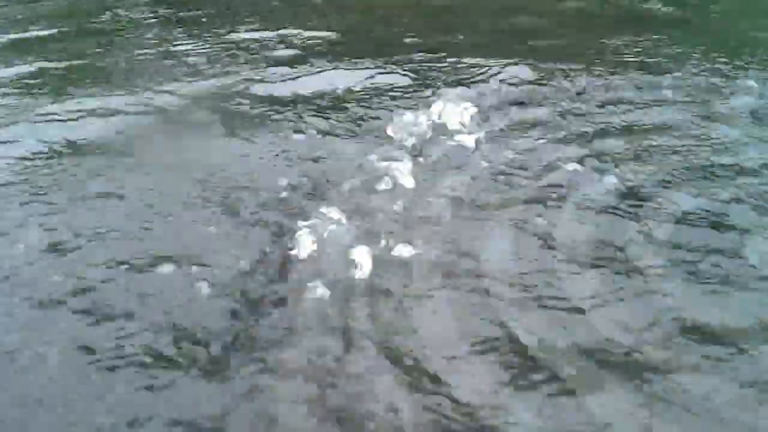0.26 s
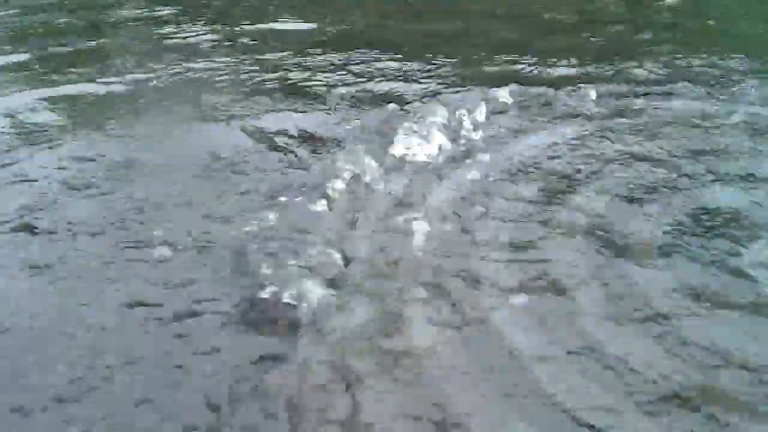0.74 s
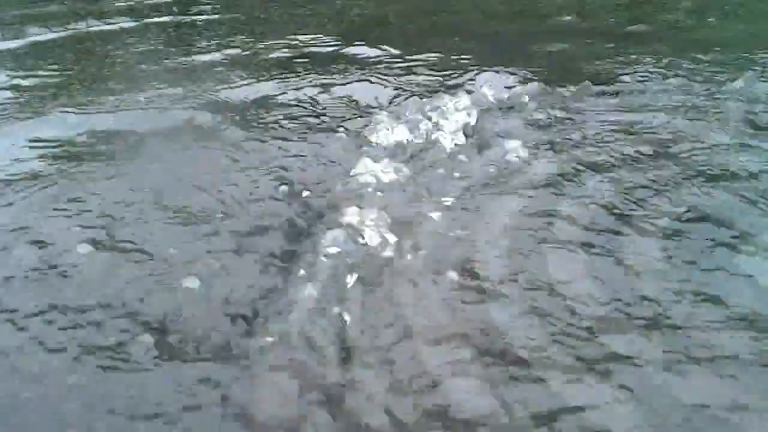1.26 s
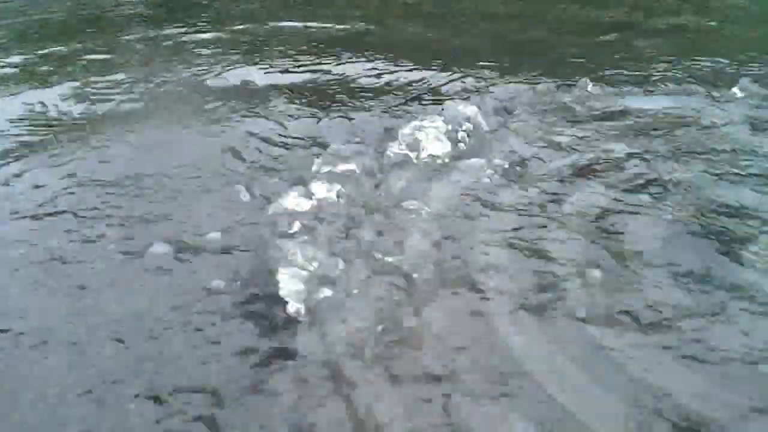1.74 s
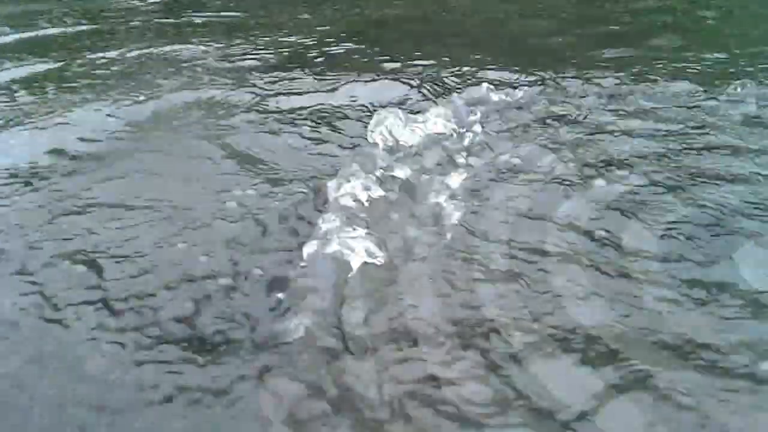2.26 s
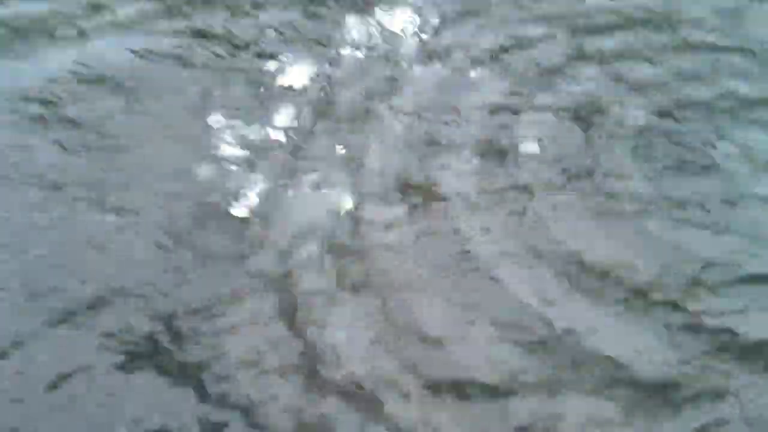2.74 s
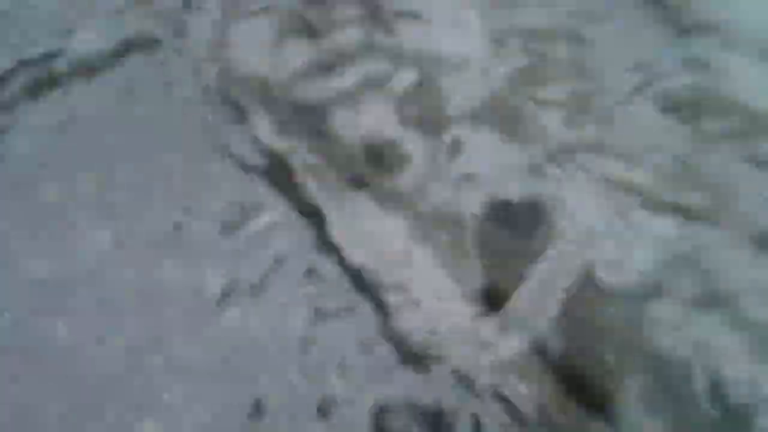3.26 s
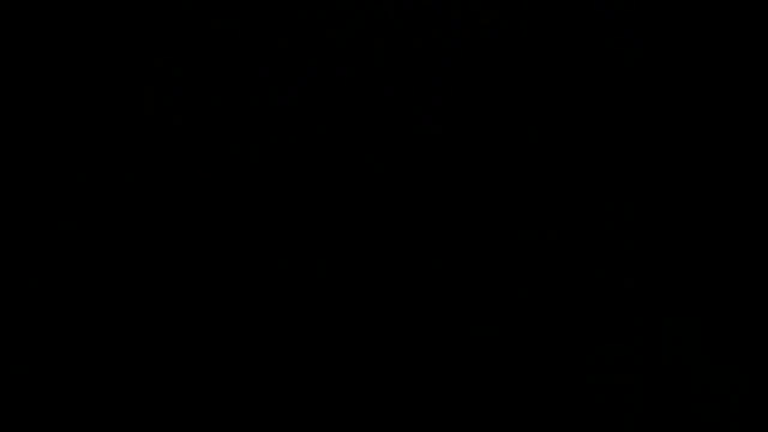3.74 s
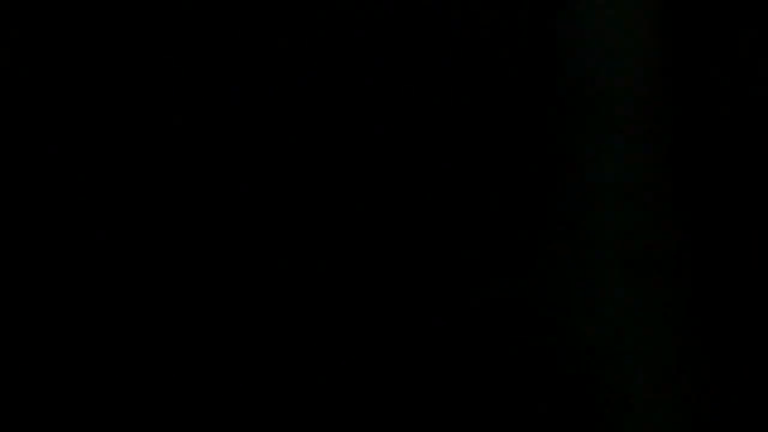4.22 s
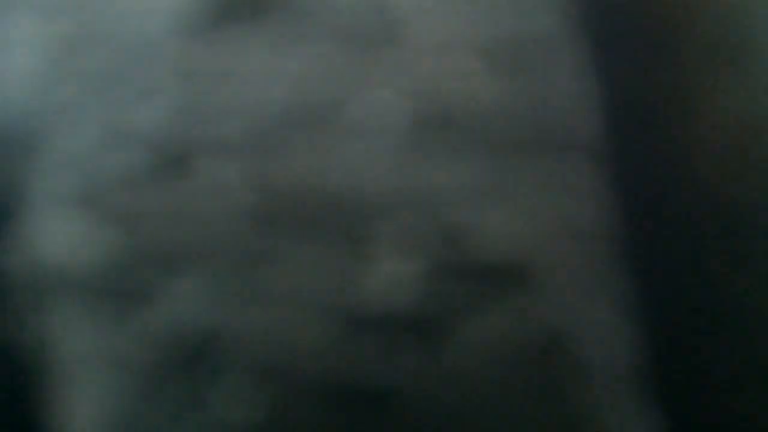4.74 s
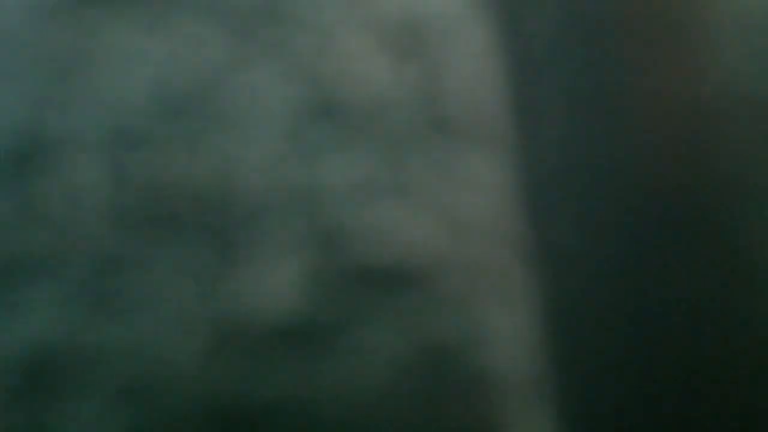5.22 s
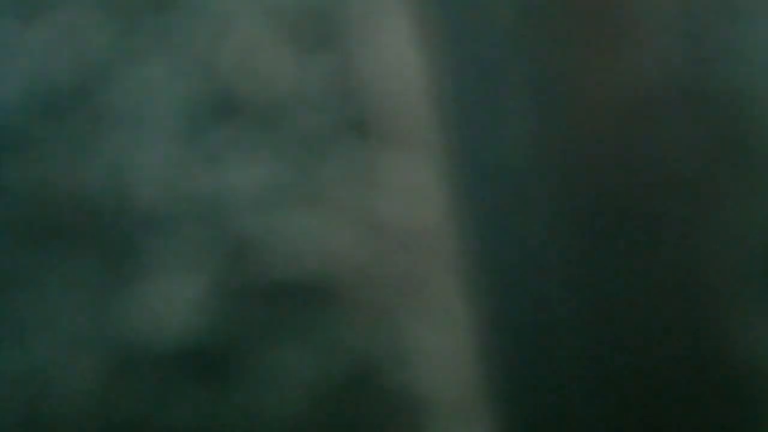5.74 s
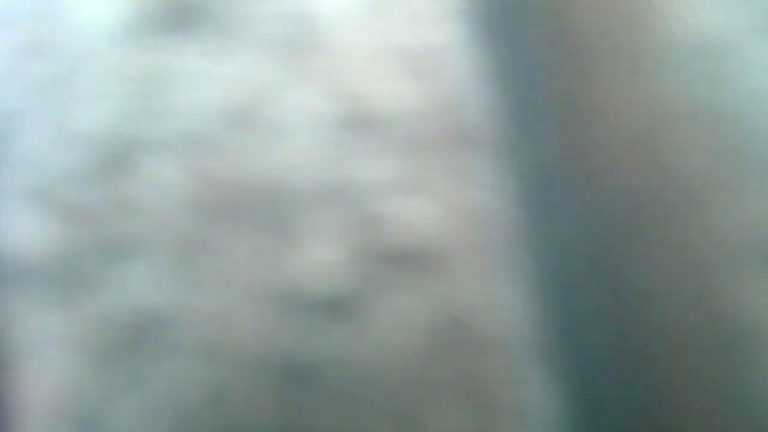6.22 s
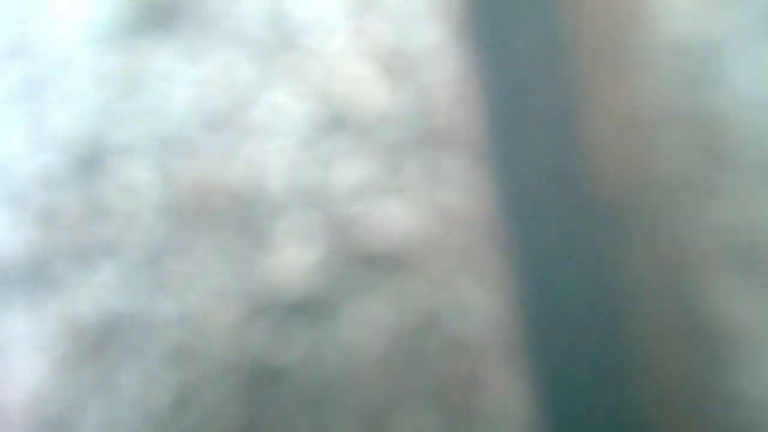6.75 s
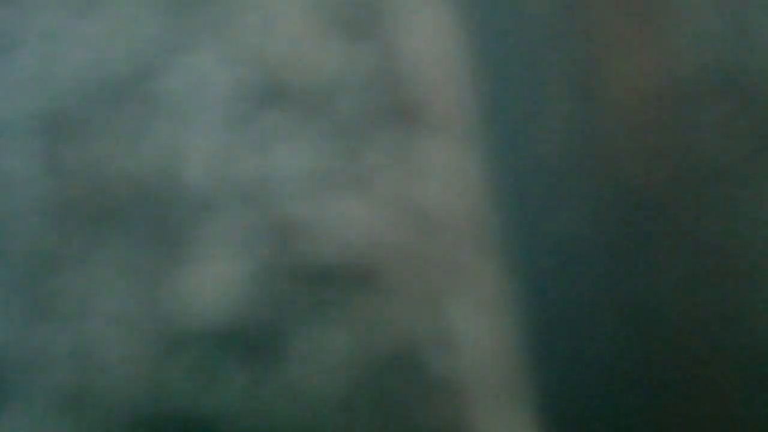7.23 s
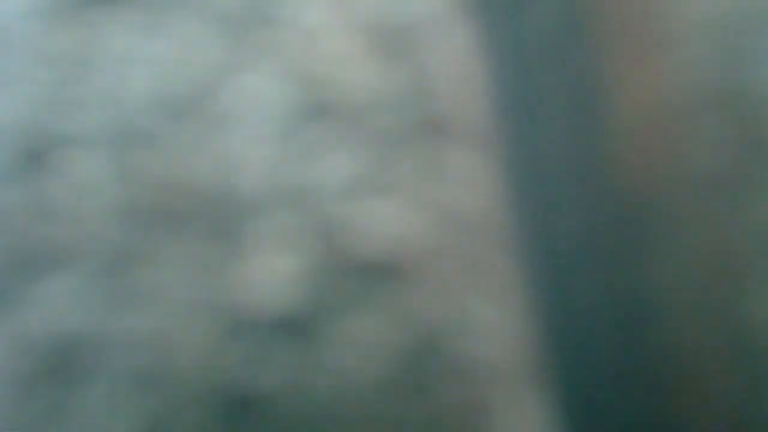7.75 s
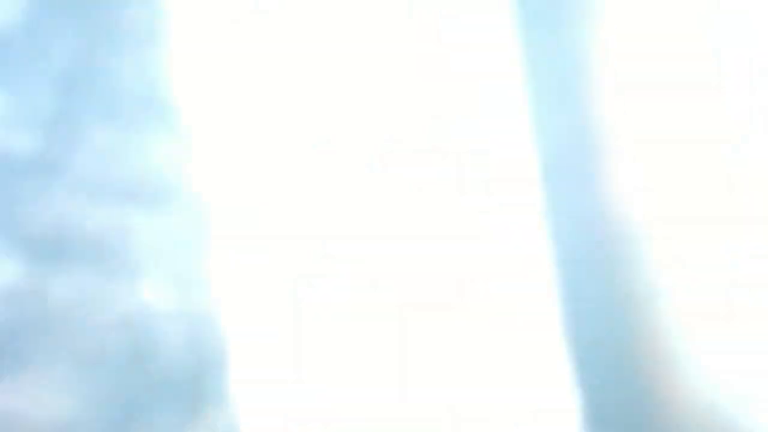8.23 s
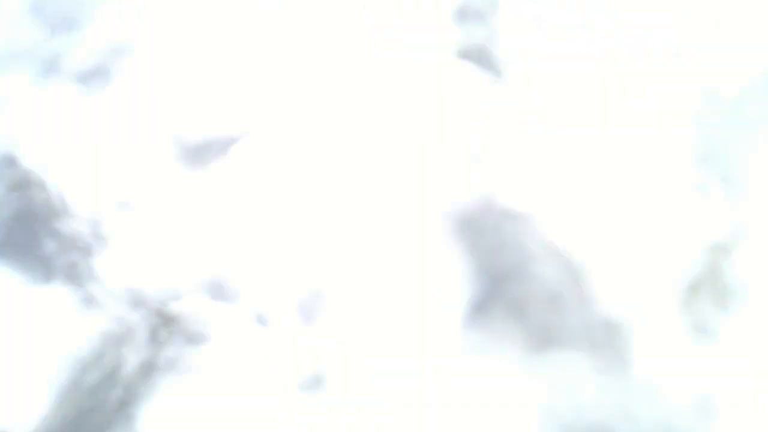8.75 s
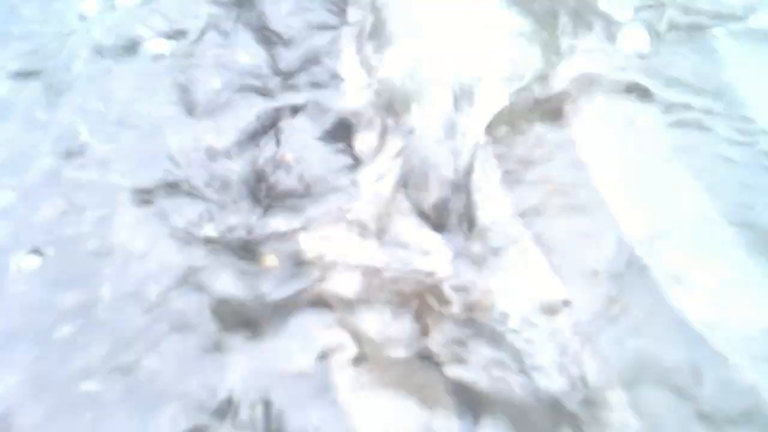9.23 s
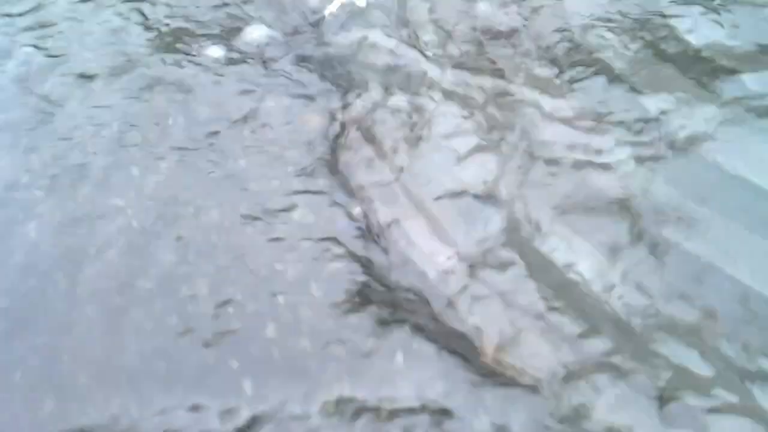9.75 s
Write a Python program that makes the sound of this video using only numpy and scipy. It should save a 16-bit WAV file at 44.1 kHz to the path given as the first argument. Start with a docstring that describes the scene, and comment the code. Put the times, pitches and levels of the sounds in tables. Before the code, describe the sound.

Quiet bright pattering of water gushing in rain comes first, steady and fairly distant. Then hollow knocks and short rubbing strokes grow as the sealed microphone enters the water. A much louder, irregular stretch follows, with bubbles popping and gurgling and wet bursts jumping left and right against it. It eases back to fizzing, trickling flow and a few drops.

```python
"""Storm water spurts from a manhole and patters onto a flooded street in the rain.
Two ports of a sealed microphone, in a waterproof camera, are lowered into the gush: water slaps and
drags along the case from about 2.7 s, closes over it near 3.8 s, then bubbles glug and spray bursts
right at the ports until they are lifted out near 9 s. Water is swarms of damped sines on shaped noise;
near bursts, bubbles, slaps and drops are placed one by one, over the low roar of rain on the street."""
import sys
import numpy as np
from scipy import signal
from scipy.fft import rfft, irfft, next_fast_len
from scipy.io import wavfile
from scipy.ndimage import uniform_filter1d, minimum_filter1d, map_coordinates

SR = 44100
rng = np.random.default_rng(int(sys.argv[2]) if len(sys.argv) > 2 else 0)


def master_out(mix):
    """Clip the mix to full scale and print it as 16-bit PCM to the path in sys.argv[1]."""
    frames = np.transpose(np.atleast_2d(mix))
    ceiling = np.clip(frames, -1, 1)
    pcm = np.round(ceiling * 32767).astype(np.int16)
    wavfile.write(sys.argv[1], SR, pcm)


N = 440096


def amp(db):
    """Decibels to amplitude."""
    return 10 ** (np.asarray(db) / 20)


def unit(x):
    """Scale to an rms of 1."""
    return x / np.sqrt(np.mean(x ** 2) + 1e-20)


def along(points, hz):
    """Read (Hz, value) points on a log frequency axis."""
    f, v = np.transpose(points)
    return np.interp(np.log(hz + 1), np.log(f + 1), v)


def curves(rows):
    """One value per sample for each column after the time."""
    s, *cols = np.transpose(rows)
    return [np.interp(np.arange(N) / SR, s, c) for c in cols]


def wobble(rate):
    """A smooth random curve, rate knots a second."""
    knots = rng.standard_normal(int(N * rate / SR) + 4)
    return map_coordinates(knots, [np.arange(N) * rate / SR])


def filtered(x, response):
    """Shape x by a real or complex response of frequency."""
    m = next_fast_len(N + 8192)
    return irfft(rfft(x, m) * response(np.fft.rfftfreq(m, 1 / SR)), m)[..., :N]


def coloured(x, spectrum):
    """Shape x by (Hz, dB) points."""
    return filtered(x, lambda hz: amp(along(spectrum, hz)))


def ports(pan_db):
    """Left and right gains of unit mean power."""
    return unit(amp([[pan_db / 2], [-pan_db / 2]]))


def add(out, s, sound):
    """Mix a stereo sound in at time s."""
    room = out[:, max(0, round(s * SR)):][:, :sound.shape[1]]
    room += sound[:, :room.shape[1]]


# Rain over the wide street. Each row: frequency in Hz, relative density in dB per Hz.
STREET_SPECTRUM = [(25, 16.5), (60, -2.5), (130, -6), (270, -2), (600, -13.5), (1200, -5.5), (2600, -23.5)]


def street():
    """The low, even roar of rain over the street: steady noise, independent at the two ports."""
    return amp(-50) * unit(coloured(rng.standard_normal((2, N)), STREET_SPECTRUM))


# Single drops into the flood. Each row: start in seconds, relative level in dB, pitch in Hz.
DROP_EVENTS = [(0.054, -27.5, 2640), (0.4825, -21.5, 4270), (0.7073, -23.5, 2140), (0.826, -24, 3410),
               (1.026, -24.5, 3060), (1.331, -25, 1430), (1.4664, -25, 5400), (1.5806, -17.5, 5080),
               (2.192, -22.5, 2800), (3.1492, -16, 6300), (3.482, -21, 4370), (3.497, -20.5, 4540),
               (8.741, -19, 3020), (8.982, -25, 1210), (9.1237, -14, 2950), (9.169, -21.5, 1344),
               (9.231, -28.5, 3640), (9.302, -24, 3080), (9.541, -28.5, 2960), (9.609, -25.5, 3300),
               (9.828, -20.5, 5140)]


def drops(cycles=5.8, tick_db=-8, plop_db=5.5, sag=0.15, size=1500):
    """A drop ticks on the surface and traps a small bubble, its pitch sagging as it is driven under."""
    out, t = np.zeros((2, N)), np.arange(size) / SR
    tick_band = signal.butter(2, [1200, 7000], "band", fs=SR)
    for s, db, hz in DROP_EVENTS:
        turns = np.cumsum(hz * (1 + sag * (2 * np.exp(-hz * t / cycles) - 1))) / SR
        envelope = np.exp(-turns / cycles) * (1 - np.exp(-2 * turns))
        ring = np.sin(2 * np.pi * turns + rng.standard_normal((2, 1))) * envelope
        tick = signal.lfilter(*tick_band, rng.standard_normal((2, size)))
        tick = tick * amp(tick_db - 60 * t / 0.017)
        add(out, s, amp(db + plop_db) * ports(rng.normal(-1.1, 1)) * (ring + tick))
    return out


# Hollow resonances of the case. Each row: frequency in Hz, width in Hz, relative level in dB.
CASE_RESONANCES = [(195, 116, -10), (650, 136, -2.5), (1306, 600, -2), (1546, 510, -0.5)]
# Water drags along the case, touching the microphone.
# Each row: start in seconds, length in seconds, relative level in dB, muffling by water 0-1.
DRAG_STROKES = [(2.659, 0.023, -37, 0.65), (2.752, 0.15, -38.5, 0.35), (3.067, 0.032, -29.5, 0.2),
                (3.291, 0.03, -26.5, 0.32), (3.802, 0.056, -32, 0.15), (4.173, 0.016, -25.5, 0.87),
                (8.334, 0.017, -28.5, 0.37), (8.786, 0.049, -31, 0.66)]
DRAG_ATTACK_S, DRAG_RELEASE_S = 0.019, 0.024  # exponential time constants
CLEAR_HZ, MUFFLE_HZ = 2000, 870  # little is kept above these, in the open and under water


def case_response(hz):
    """Resonances of the hollow case, summed with alternating sign."""
    total = 0
    for k, (centre, width, db) in enumerate(CASE_RESONANCES):
        damping = 1j * hz * width
        total = total + (-1) ** k * amp(db) * damping / (centre * centre - hz * hz + damping)
    return total


def drag(slips_per_s=170, slip_db=1, uneven_db=2):
    """Strokes of rubbing, broken by small slips, swell, hold and fade through the case resonances."""
    t = np.arange(N) / SR
    slips = unit((rng.random(N) < slips_per_s / SR) * rng.standard_normal(N))
    rub = rng.standard_normal(N) + 0.3 * rng.standard_normal((2, N))
    rub = rub * amp(3 * wobble(160))
    rub = (rub + amp(slip_db) * slips) * amp(uneven_db * wobble(42))

    def through_case(top_hz):
        return unit(filtered(rub, lambda hz: case_response(hz) / np.hypot(1, (hz / top_hz) ** 4)))

    clear, muffled = through_case(CLEAR_HZ), through_case(MUFFLE_HZ)
    out = np.zeros((2, N))
    for s, length, db, wet in DRAG_STROKES:
        rise = np.minimum(t - s, 0) / DRAG_ATTACK_S
        fall = np.maximum(t - s - length, 0) / DRAG_RELEASE_S
        out += amp(db) * np.exp(rise - fall) * (clear + min(wet, 1) * (muffled - clear))
    return out


# Water slaps the case at the microphone. Each row: start in seconds, relative level in dB, ring in Hz.
SLAP_EVENTS = [(2.678, -28.5, 730), (2.855, -26.5, 1530), (2.887, -31, 690), (3.009, -20, 652),
               (3.203, -13.5, 653), (3.251, -24.5, 640), (3.341, -12, 1320), (3.37, -29, 670),
               (3.394, -29.5, 576), (3.654, -19, 1300), (3.673, -12.5, 1350), (3.683, -8.5, 990),
               (3.723, -21.5, 1420), (3.811, -10, 510), (3.831, -20.5, 330), (3.846, -19, 490),
               (3.857, -23.5, 346), (3.869, -20, 467), (3.88, -16, 490), (3.888, -17.5, 516),
               (3.901, -19, 510), (3.932, -21, 540), (3.944, -37, 710), (3.967, -23.5, 537),
               (3.997, -26.5, 536), (4.017, -25, 503), (4.097, -12.5, 589), (4.172, -21, 505),
               (4.531, -25.5, 735), (7.546, -11.5, 927), (8.806, -22.5, 644), (8.834, -19.5, 620)]
DEEP_HZ, SHALLOW_HZ = 562, 595  # a deep slap traps more air: it rings lower and pushes harder
DEEP_PUSH_DB, SHALLOW_PUSH_DB = 1.5, -19  # low push against the ring


def slaps(ring_cycles=19, crack_db=-12, crack_t60=0.0097, push_hz=264, push_t60=0.033,
          push_attack_s=0.0038, smack_hz=1350, smack_t60=0.022, smack_db=-8, apart=0.2, size=4000):
    """A slap gives the case a low push, a hollow ring, a short wet smack and a sharp crack."""
    out, t = np.zeros((2, N)), np.arange(size) / SR
    smack_band = signal.butter(3, [smack_hz / 1.5, smack_hz * 1.5], "band", fs=SR)
    crack_band = signal.butter(2, [600, 3800], "band", fs=SR)
    lead = apart * np.array([[-1], [1]])  # radians: the two ports move a little out of step

    def noise(band, level_db, t60):
        return unit(signal.lfilter(*band, rng.standard_normal((2, size)))) * amp(level_db - 60 * t / t60)

    for s, db, hz in SLAP_EVENTS:
        push_db = np.interp(hz, [DEEP_HZ, SHALLOW_HZ], [DEEP_PUSH_DB, SHALLOW_PUSH_DB])
        ring = np.sin(2 * np.pi * hz * t + lead) * amp(-60 * hz * t / ring_cycles)
        push = np.sin(2 * np.pi * push_hz * amp(rng.normal(0, 1)) * t + lead)
        push = push * amp(push_db - 60 * t / push_t60) * (1 - np.exp(-t / push_attack_s))
        smack = noise(smack_band, smack_db, smack_t60)
        crack = noise(crack_band, crack_db, crack_t60)
        slap = (ring + push + smack + crack) * (1 - np.exp(-t / 0.0004))
        add(out, s, amp(db) * ports(rng.normal(-0.45, 1.8)) * slap)
    return amp(10) * out


# Bubbles that ring on while they rise near the ports.
# Each row: start in seconds, length in seconds, relative level in dB, first pitch in Hz, last pitch in Hz.
WHOOP_EVENTS = [(3.497, 0.11, -42.5, 844, 1380), (5.201, 0.051, -35, 970, 1460),
                (5.373, 0.027, -26.5, 668, 970), (6.066, 0.045, -31.5, 562, 640),
                (6.225, 0.12, -38, 644, 1325), (6.319, 0.081, -31.5, 705, 1286),
                (6.494, 0.054, -31, 715, 1210), (8.344, 0.087, -30.5, 555, 805),
                (8.597, 0.11, -44.5, 649, 965), (8.928, 0.029, -37.5, 1000, 1210)]
WHOOP_SWELL, WHOOP_BEND = 0.11, 1.6  # share of the length spent swelling; the climb speeds up


def whoops(waver=0.021, flutter_db=3, level_db=4, overtone_db=-9):
    """A rising bubble, shaken by the stream, swells and fades while its pitch sweeps up."""
    out = np.zeros((2, N))
    for s, length, db, first_hz, last_hz in WHOOP_EVENTS:
        u = np.linspace(0, 1, int(length * SR))
        shake, flutter = (map_coordinates(knots, [u * 11]) for knots in rng.standard_normal((2, 12)))
        hz = first_hz * (last_hz / first_hz) ** (u ** WHOOP_BEND) * (1 + waver * shake)
        level = np.minimum(u / WHOOP_SWELL, 1) * np.sqrt(1 - u)
        level = level * amp(db + level_db + flutter_db * flutter)
        phase = 2 * np.pi * np.cumsum(hz) / SR
        tone = np.sin(phase) + amp(overtone_db) * np.sin(2 * phase)
        add(out, s, ports(rng.normal(-2, 1.5)) * level * tone)
    return out


# Large air bubbles close to the ports. Each row: start in seconds, relative level in dB, pitch in Hz,
# left-right difference in dB, first decay by 60 dB in seconds, climb as a share of the pitch (negative sinks).
BUBBLE_EVENTS = [(3.296, -12, 1490, 6, 0.018, -0.058), (3.685, -5, 1284, 5, 0.014, -0.015),
                 (3.693, -15.5, 740, -2, 0.059, -0.24), (3.906, -17, 643, 10, 0.15, 0.13),
                 (4.065, -15, 1198, -14, 0.13, 0.1), (4.082, -12, 2010, -36, 0.027, -0.52),
                 (4.242, -7.5, 1010, 5, 0.011, 0.24), (4.418, -14, 1177, -28, 0.088, 0.017),
                 (4.537, -17, 1080, 18, 0.065, -0.086), (4.601, -13, 1090, 0, 0.062, 0.53),
                 (4.672, -16.5, 1284, -14, 0.036, 0.14), (4.724, -10.5, 2700, -18, 0.0087, -0.17),
                 (5.161, -16, 1065, -9, 0.039, -0.26), (5.164, -21.5, 660, 1, 0.13, .25),
                 (5.333, -10.5, 1464, -36, 0.041, -0.22), (5.349, -17, 674, -11, 0.23, 0.2),
                 (5.623, -19, 1064, -15, 0.14, -0.027), (5.622, -16, 3720, -14, 0.014, -.1),
                 (5.803, -23, 1900, -5, 0.028, 0.0066), (5.865, -13, 1454, -4, 0.053, 0.058),
                 (5.893, -15.5, 1470, -6.5, 0.077, 0.29), (5.956, -22.5, 1420, -12, 0.085, -0.17),
                 (5.985, -18, 1260, -5, 0.046, 0.044), (6.005, -16.5, 3480, 5, 0.02, -0.36),
                 (6.039, -18.5, 1160, 3, 0.029, -0.092), (6.266, -21.5, 855, -4, 0.27, 0.33),
                 (6.408, -24, 638, 0, 0.12, -0.034), (6.426, -14, 1670, 8, .03, 0.21),
                 (6.556, -18.5, 1310, -3, 0.048, 0.011), (6.859, -11.5, 1067, -6, 0.013, 0.18),
                 (6.86, -14.5, 3070, 1, 0.018, -0.31), (7.258, -20, 1210, 9, 0.068, .1),
                 (7.443, -18, 1130, -8, 0.09, -0.25), (7.608, -21, 830, -6, 0.063, 0.1),
                 (7.706, -12, 2660, -4, 0.015, 0.055), (7.775, -12, 1450, -22, 0.031, 0.034),
                 (7.915, -22.5, 878, -7, 0.12, 0.21), (8.025, -16, 1623, -15, 0.045, -0.091),
                 (8.107, -17.5, 1380, 3, 0.022, -0.027), (8.164, -15, 1043, 0, 0.022, 0.011),
                 (8.18, -16.5, 1356, 3, 0.035, 0.094), (8.24, -19.5, 1720, -21, 0.055, -0.19),
                 (8.397, -13, 2800, 9, 0.0072, 0.099), (8.477, -11.5, 705, 0, 0.041, -0.021),
                 (8.499, -13, 1303, 2.5, 0.087, 0.078), (8.52, -10, 1580, 7, 0.016, 0.13),
                 (9.073, -12, 2800, 0, 0.021, -0.065)]


def bubbles(rise_s=0.0312, pinch_db=-4, satellite_db=-12, tail=0.7, tail_t60=0.046,
            onset_cycles=0.19, size=8000):
    """A bubble ticks off, sheds a briefer one and rings, climbing to the surface or sinking as pulled down."""
    out, t = np.zeros((2, N)), np.arange(size) / SR
    tick_band = signal.butter(2, [450, 5000], "band", fs=SR)
    for s, db, hz, pan_db, t60, climb in BUBBLE_EVENTS:
        lag, soft = rng.standard_normal(2)
        shake = unit(uniform_filter1d(uniform_filter1d(rng.standard_normal(size), 130), 130))
        pitch_hz = hz * (0.99 + climb * np.log1p(t / rise_s) + 0.033 * shake)
        phase = 2 * np.pi * np.cumsum(pitch_hz) / SR
        onset = 1 - np.exp(-hz * t / onset_cycles / amp(0.83 * soft))
        decay = amp(-60 * t / t60) + tail * amp(-60 * t / tail_t60)
        flutter = amp(2 * shake * (1.5 - np.exp(-t / 0.043)))
        ring = decay * onset * flutter * np.sin(phase + lag * np.array([[0.5], [-0.5]]))
        tick = unit(signal.lfilter(*tick_band, rng.standard_normal(size)))
        tick = tick * amp(pinch_db - 60 * t / 0.00073)
        satellite = amp(satellite_db - 120 * t / t60) * onset * np.sin(rng.uniform(1, 2.7) * phase)
        add(out, s, amp(db) * ports(pan_db) * (ring + satellite + tick))
    return amp(2) * out


# Foam around the bursts. Each row: frequency in Hz, relative density in dB per Hz.
FROTH_SPECTRUM = [(300, -18.5), (700, 0), (1500, 1.5), (3000, 2), (6000, -7.5), (9500, -15), (13000, -31)]
FROTH_DB, FROTH_RISE_S, FROTH_FALL_S = -6.5, 0.01, 0.002  # level against the burst, time constants
FROTH_FULL_MS = 10.2  # shorter bursts raise less


def froth(rough_db=4):
    """Foam seethes up ahead of each burst and dies away behind it, on the same side, as rough noise."""
    t = np.arange(int(0.12 * SR)) / SR - 0.03
    power = np.zeros((2, N))
    for s, db, _, ms, pan_db in BURSTS:
        swell = np.exp(np.minimum(t, 0) / FROTH_RISE_S - np.maximum(t - ms / 1000, 0) / FROTH_FALL_S)
        level = amp(db + FROTH_DB) * min(ms / FROTH_FULL_MS, 1)
        add(power, s + t[0], (level * ports(pan_db) * swell) ** 2)
    seethe = rng.standard_normal((2, N)) * amp(rough_db * wobble(1200))
    return np.sqrt(power) * unit(coloured(seethe, FROTH_SPECTRUM))


SPATTER_LAG_S, SPATTER_DB, SPATTER_MS = 0.023, -14, 1.3  # delay scatter, level to the burst, typical length
SPATTER_FULL_MS = 9.1  # shorter bursts than this throw off less


def spatter(count=2):
    """Each burst trails a few smaller ones of about its pitch, near its side."""
    small = []
    chance = rng.standard_normal((len(BURSTS), count, 5))
    for (s, db, hz, ms, pan_db), rows in zip(BURSTS, chance):
        parent_db = db + 10 * np.log10(min(ms / SPATTER_FULL_MS, 1))
        for when, big, pitch, long, side in rows:
            start = s + 0.0025 + SPATTER_LAG_S * abs(when)
            small.append((start, parent_db + SPATTER_DB + 3 * big, hz * 2 ** (0.35 * pitch),
                          SPATTER_MS * amp(3.2 * long), pan_db + 8 * side))
    return small


# Bursts of spray right at the ports. Each row: start in seconds, relative energy in dB (rms over 10 ms),
# centre in Hz, nominal length in ms, left-right difference in dB.
BURSTS = [(3.506, -30.5, 3100, 0.76, -2), (3.653, -14, 5840, 1.79, 2.5), (3.802, -13, 2740, 7.6, 9),
          (3.843, -26, 1670, 2.14, -9), (4.409, -19.5, 930, 1.42, -12), (4.533, -21, 3100, 2.56, 4),
          (4.734, -15.5, 2390, 5.65, 4), (4.81, -19.5, 2540, 4.34, 27), (4.82, -11.5, 2800, 1.96, 40),
          (4.965, -17, 2240, 1.38, 26), (4.972, -21, 2680, 1.9, 18), (5.004, -21, 3260, 1.4, 28),
          (5.019, -17, 3000, 10, 10), (5.039, -16.5, 1550, 0.64, -26), (5.125, -27.5, 7000, 1.56, 12),
          (5.145, -16, 3030, 6.9, 25), (5.186, -20.5, 2460, 3.6, 32), (5.264, -17, 3150, 4.3, 35),
          (5.309, -23, 1450, 0.61, -32), (5.408, -24, 1770, 1, -15), (5.448, -16, 3050, 15.8, 20),
          (5.497, -18.5, 2450, 5.3, 31), (5.562, -18.5, 3040, 11.8, 16), (5.597, -22.5, 1180, 0.72, -12),
          (5.622, -24, 3600, 1.8, -4), (5.666, -25.5, 5270, 1.2, 2), (5.703, -14.5, 3200, 9.5, 8),
          (5.759, -17.5, 2090, 7.1, 32), (5.827, -20, 2770, 2.7, 21), (5.833, -19.5, 2470, 4, 31),
          (5.849, -19, 2760, 2.14, 8), (5.918, -21, 2840, 4.8, 1.5), (5.985, -20.5, 1900, 1.83, -2),
          (6.013, -21, 2520, 5.7, 7), (6.074, -17.5, 2810, 8, 34), (6.13, -15.5, 2640, 4.5, -15),
          (6.157, -25, 2860, 1.37, -18), (6.214, -18.5, 2390, 7.8, -21), (6.324, -20.5, 3080, 1.63, -38),
          (6.339, -21, 2330, 2.3, -13), (6.359, -20.5, 2920, 3.25, -18), (6.441, -15, 3340, 7, -20),
          (6.511, -19, 3240, 1.88, 2.5), (6.52, -32, 2900, 0.65, 5), (6.55, -25, 2700, 1.2, 10),
          (6.582, -14, 3140, 1.62, 3), (6.837, -27, 3300, 0.44, -5), (6.859, -17.5, 2370, 3, 0),
          (6.902, -21, 2300, 1.9, -6), (6.925, -33, 3380, 0.73, 10), (6.941, -19, 2600, 7, 10),
          (6.956, -22, 4270, 0.91, -18), (6.986, -25, 2820, 1.8, 20), (7.013, -18, 2930, 2.83, 18),
          (7.023, -26.5, 2840, 0.8, 11), (7.051, -18, 3400, 2.3, 27), (7.073, -26.5, 3430, 0.73, 5),
          (7.123, -21.5, 8600, 4.9, -21), (7.139, -21.5, 4040, 6.1, -1), (7.21, -22.5, 2300, 0.72, -7),
          (7.219, -16, 2720, 1.38, 0), (7.243, -15.5, 3500, 22.4, 14), (7.305, -11, 3000, 6.9, 15),
          (7.316, -22, 2880, 8.3, 17), (7.434, -20, 2830, 1, -10), (7.439, -24.5, 5530, 2.2, -2),
          (7.496, -18, 1710, 22.2, -8), (7.514, -2.5, 2850, 1.13, 9), (7.608, -22.5, 2320, 2.03, -2),
          (7.699, -19.5, 4300, 4.8, 6), (7.728, -11, 2630, 3.85, -13), (7.773, -25, 2560, 9.8, -9),
          (7.792, -18.5, 2320, 13.5, -8), (7.816, -24, 2980, 11, -24), (8.024, -17, 2930, 18.9, -8),
          (8.118, -23.5, 1980, 5.1, -5), (8.287, -18.5, 2540, 2.56, 1), (8.52, -22.5, 1680, 0.7, 3),
          (8.581, -22, 3250, 0.63, -4.5), (9.041, -26, 3040, 0.38, -15)]
SPREAD_OCTAVES = 0.41  # scatter of bubble pitches within a burst
THUD_DB, THUD_HZ, THUD_T60 = -32.5, 425, 0.027  # a burst also knocks the case; pitch and level vary


def splashes(cycles=1.37, grain_db=5, hiss_db=-8, hiss_hz=7000, click_hz=8000):
    """A clump of tiny bubbles rings around one pitch in a puff of hiss, over a dull thud."""
    out, ways = np.zeros((2, N)), np.array([1, -1])[:, None, None]
    for s, db, centre_hz, ms, pan_db in BURSTS + spatter():
        length, count = max(ms, 0.5) / 1000, 2 + int(1.5 * ms)
        t = np.arange(int((2 * length + 0.012) * SR)) / SR
        own = np.random.default_rng(rng.integers(2 ** 31))
        knock = own.standard_normal(2)
        when = (np.arange(count) + own.random(count))[:, None] / count * length
        pitch, big, twist = own.standard_normal((3, count, 1))
        hz = np.clip(centre_hz * 2 ** (SPREAD_OCTAVES * (pitch - pitch.mean())), 400, 11000)
        lead = ways * np.tanh(pan_db / 10) * 45e-6  # seconds: the nearer port hears it first
        turns = np.float32(hz * np.maximum(t + lead - when, 0))
        life = cycles * min(length / 0.002, 1) ** 0.5 * amp(3 * big)  # stronger bubbles ring longer
        rings = np.sin(2 * np.pi * turns + np.float32(ways * twist / 2))
        rings = rings * np.exp(-turns / life) * (1 - np.exp(-2 * turns))
        clump = (amp(grain_db * big) * np.sqrt(hz / centre_hz) * rings).sum(axis=1)

        swell = np.sqrt(t / length) * np.exp(-2 * (t / length) ** 2) + 0.18 * np.exp(-t / length / 2)
        hiss_edges = [min(centre_hz / 3, 2500), np.clip(hiss_hz, 3000, SR / 3)]
        hiss_band = signal.butter(2, hiss_edges, "band", fs=SR)
        puff = signal.lfilter(*hiss_band, swell * own.standard_normal((2, len(t))))
        top = signal.butter(4, min(9500 + click_hz / ms, 17000), fs=SR)  # short bursts are brighter
        burst = unit(signal.lfilter(*top, unit(clump) + amp(hiss_db) * unit(puff)))

        thud = np.sin(2 * np.pi * THUD_HZ * amp(2 * np.tanh(knock[0])) * t)
        thud = unit(thud * amp(-60 * t / THUD_T60) * (1 - np.exp(-t / 0.0028)))
        thud = amp(THUD_DB + min(knock[1], 1)) * ports(pan_db / 2) * thud
        level = amp(db) * np.sqrt(SR / 100 / len(t))  # the same energy however long it lasts
        add(out, s, level * (ports(pan_db) * burst + thud))
    return amp(1) * out


def droplets(rate, centre_hz, spread, cycles, size_db, apart_db, glide=0, onset=1.0, size=100):
    """A stereo swarm of small bubbles, each a damped sine with its own pitch, glide, size and side."""
    count = int(rate * N / SR)
    t = np.arange(size) / SR
    when, big, *chance = rng.random((count, 6)).T
    # logistic draws, close to normal ones
    pitch, side, turn, bend = (np.log(c / (1 - c))[:, None] / np.sqrt(np.pi) for c in chance)
    hz = np.minimum(centre_hz * 2 ** (spread * pitch), SR / 3)
    phase = np.float32(hz * t * (1 + glide * (1 + bend) * t))
    strength = amp(size_db * np.minimum(-np.log(1 - big), 4.5))[:, None]
    fade = strength * (np.exp(-phase / cycles) * (1 - np.exp(-phase / onset))) * (1 - t / t[-1])
    where = ((when * N).astype(int)[:, None] + np.arange(size)).ravel()
    heard = []
    for way in (1, -1):
        rings = np.sin(2 * np.pi * phase + np.float32(way * turn / 2))
        grains = fade * amp(way * apart_db * side / 2) * rings
        heard.append(np.bincount(where, grains.ravel(), N)[:N])
    return unit(np.array(heard))


def water(spectrum, grains, wash_db):
    """Near bubbles on the wash of countless far ones, coloured, at rms 1."""
    wash = rng.standard_normal((2, N)) + 0.37 * rng.standard_normal(N)
    near, far = unit(coloured(grains, spectrum)), unit(coloured(wash, spectrum))
    return unit(near + amp(wash_db) * far)


# Running water at the ports. Each row: time in seconds, then relative level in dB of gurgle, fizz, fine spray.
FLOW_LEVELS = [(0.0, -53.5, -46.5, -41), (2.42, -53.5, -48.5, -40.5), (3.7, -44, -42.5, -34),
               (3.89, -51, -48.5, -51), (4.2, -46.5, -41.5, -103), (4.67, -37, -36.5, -74),
               (4.97, -39.5, -45.5, -39), (5.56, -32.5, -35.5, -38), (5.89, -37.5, -40.5, -45),
               (6.64, -38.5, -36, -27.5), (7.17, -41, -32, -28.5), (7.67, -43.5, -48, -47.5),
               (8.23, -39, -34.5, -35), (8.53, -44.5, -44, -36), (8.95, -42.5, -41, -30.5),
               (9.25, -51.5, -46, -36), (9.98, -52.5, -50.5, -40)]
# The camera's dip. Each row: time in seconds, depth in the gush 0-1, water film on the ports 0-1.
DIP_PATH = [(3, 0, 0), (4, 1, 0), (7.5, 1, 0), (8.1, 1, 1), (9.2, 0, 1)]
# Colour of the three bands. Each row: frequency in Hz, relative density in dB per Hz.
GURGLE_SPECTRUM = [(100, -25.5), (300, -5.5), (600, 1.5), (900, -3.5), (1300, -1.5), (1900, -2),
                   (2300, -9.5), (4000, -51)]
FIZZ_SPECTRUM = [(1000, -14.5), (2150, -3), (2900, 3), (4400, 1.5), (5500, -0.5), (7000, -33), (11000, -67)]
SPRAY_SPECTRUM = [(3500, -11.5), (6000, -3), (7600, -3), (9300, -8.5), (11000, -25), (16000, -52)]
# Wet microphone ports. Each row: frequency in Hz, gain in dB.
FILM_RESPONSE = [(900, -1), (1300, 5), (2200, 1.5), (3050, 6.5), (4000, -2.5), (5000, -7.5), (6200, 1.5),
                 (7400, 3)]
GURGLE_DB, FIZZ_DB, SPRAY_DB = 2, 5.5, -9.5  # each layer over its curve, in the open air
DIPPED_GURGLE_DB, DIPPED_FIZZ_DB, DIPPED_SPRAY_DB = -1, -13.5, -8.5  # added down in the gush: muffled
WET_LAG_S = 0.00009  # with wet ports the sound reaches the left one first


def wet_ports(hz):
    """A film of water colours the sound and shifts the two ports in time."""
    lag = np.exp(1j * np.pi * hz * WET_LAG_S * np.array([[1], [-1]]))
    return amp(along(FILM_RESPONSE, hz)) * lag


def flow():
    """Gurgle, fizz and spray of bubble swarms; down in the gush each port is hit by its own spurts."""
    gurgle_db, fizz_db, spray_db = curves(FLOW_LEVELS)
    dipped, wet = curves(DIP_PATH)
    surge = wobble(260) + 1.63 * np.array([wobble(70), wobble(70)])
    churn_db = (1.29 + 6.03 * dipped) * np.minimum(surge, 2)

    # under water the bubbles ring longer and glide, most of them upward
    glugs = droplets(95, 1250, 0.5, 14, 1.4, 5, glide=2.6, onset=3, size=2400)
    plips = droplets(200, 1550, 0.44, 7.5, 2, 4, glide=2, size=900)
    plinks = droplets(90, 3150, 0.42, 6.5, 2.8, 4, size=450)
    ticks = dipped * droplets(62, 2960, 0.62, 1, 3.9, 14.6)  # tiny bubbles snap against the ports
    fizzing = droplets(650, 4020, 0.81, 1.5, 5.2, 11.7)
    spraying = droplets(900, 5680, 0.51, 3, 5.5, 16, size=60)
    bubbling = unit(dipped * glugs + 0.99 * (1 - dipped) * plips)

    gurgle_gain = amp(gurgle_db + GURGLE_DB + DIPPED_GURGLE_DB * dipped + 0.72 * churn_db)
    fizz_gain = amp(fizz_db + FIZZ_DB + DIPPED_FIZZ_DB * dipped + churn_db)
    spray_gain = amp(spray_db + SPRAY_DB + DIPPED_SPRAY_DB * dipped + churn_db)
    running = gurgle_gain * water(GURGLE_SPECTRUM, bubbling, wash_db=-7)
    running = running + fizz_gain * water(FIZZ_SPECTRUM, plinks + 2 * ticks + fizzing, wash_db=-4)
    running = running + spray_gain * water(SPRAY_SPECTRUM, spraying, wash_db=-2)
    # the film colour fades in late in the dip and stays as the camera comes up
    return (1 - wet) * running + wet * filtered(running, wet_ports)


def scene():
    """Rain and running water, with the near splashes, bubbles and knocks on the case."""
    background = street() + drops()
    on_case = drag() + slaps()
    near_water = whoops() + bubbles() + froth() + splashes()
    return background + on_case + near_water + flow()


TOP_HZ = 16700  # band limit


def record(dry, bass_hz=115, treble_hz=11500, ceiling=0.91):
    """The sealed microphone thins bass and top; a fast limiter holds peaks; a band limit ends the chain."""
    heard = signal.lfilter(*signal.butter(2, bass_hz, "high", fs=SR), dry)
    heard = filtered(heard, lambda hz: 1 / np.hypot(1, (hz / treble_hz) ** 3))
    needed = np.minimum(1, ceiling / (np.abs(heard).max(axis=0) + 1e-9))
    # one gain for both ports, smoothed over 65 samples
    gain = uniform_filter1d(minimum_filter1d(needed, size=65), size=65)
    return filtered(heard * gain, lambda hz: hz < TOP_HZ)


dry = scene()
out = record(dry)
master_out(out)
```